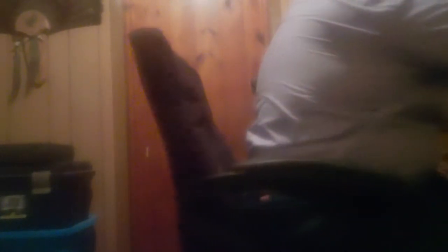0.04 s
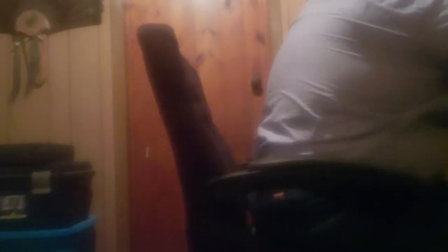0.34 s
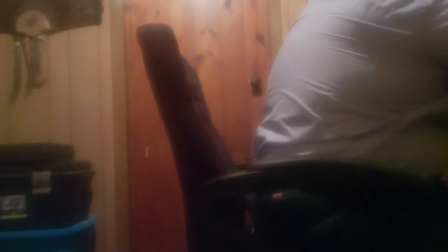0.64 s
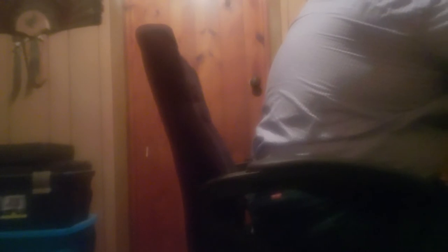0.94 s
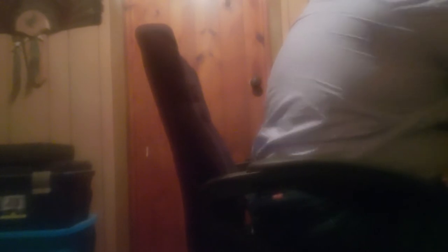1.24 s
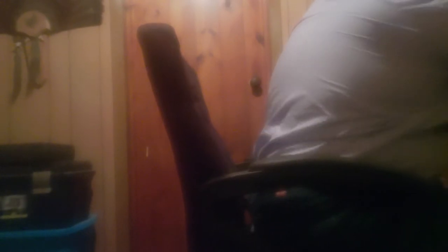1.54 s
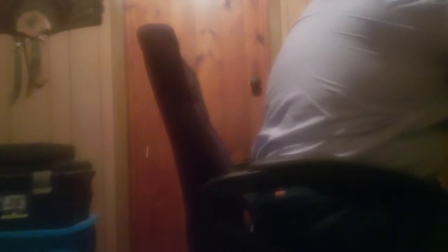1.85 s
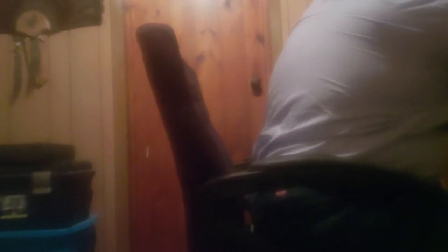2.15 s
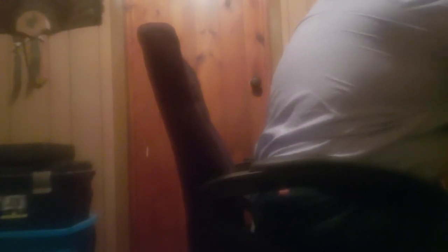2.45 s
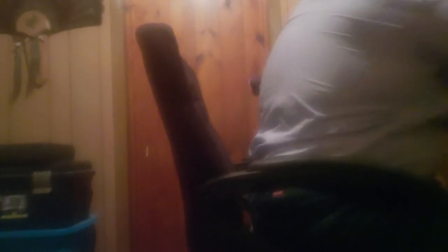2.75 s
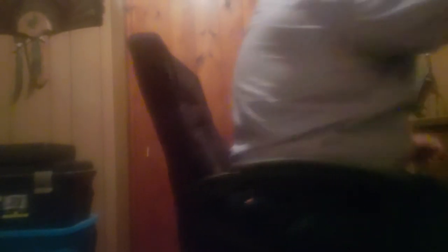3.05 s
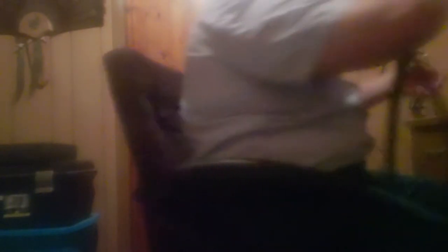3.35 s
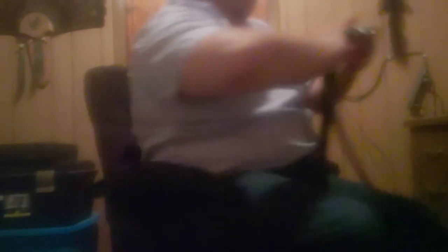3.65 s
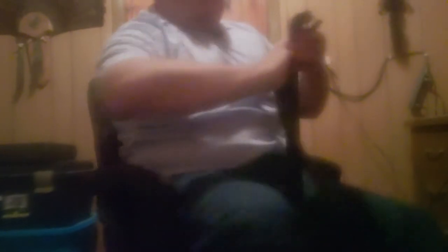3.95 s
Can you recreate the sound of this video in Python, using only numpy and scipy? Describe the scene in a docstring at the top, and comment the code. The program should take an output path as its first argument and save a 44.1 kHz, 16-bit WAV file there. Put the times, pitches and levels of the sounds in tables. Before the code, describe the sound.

An office chair knocks and creaks as someone shifts in it, loudest in the first 0.6 seconds, with two small metallic ticks. Lighter knocks and soft clothing rustle follow around 1.3 and 2.5 seconds. From about 3.3 seconds the chair swivels with a high, slightly wavering squeak, a brief rumble and more knocks, lasting until 4 seconds. A faint low hum fills the small room throughout.

```python
"""An office chair in a small wood-panelled room, a stereo microphone across the room from it.
Over a low mains hum, someone shifts in the seat: the frame knocks and creaks as its contacts
chatter, a steel part pings, and clothes brush the upholstery. After about three seconds the chair
swivels: the dry bearing sticks and slips in a high squeak, its left-right balance shifting with
the room's reflections, while the chair rumbles round and the frame knocks on."""
import sys
import numpy as np
from scipy import signal
from scipy.fft import rfft, irfft
from scipy.io import wavfile

SR = 44100
rng = np.random.default_rng(int(sys.argv[2]) if len(sys.argv) > 2 else 0)


def generate_wav(sig):
    """Save sig (samples, or channels by samples) to the path in sys.argv[1] as 16-bit PCM at SR."""
    pcm = np.round(np.clip(np.atleast_2d(sig).T, -1, 1) * 32767).astype(np.int16)
    wavfile.write(sys.argv[1], SR, pcm)


N = 176400
TIME = np.arange(N) / SR
CHAIR_WET = 0.9  # the room's share of the power of knocks and rubbing at the microphone


def from_db(db):
    """Decibels to gain."""
    return 10 ** (np.asarray(db) / 20)


def unit_rms(x):
    """Scale to unit rms."""
    return x / np.sqrt(np.mean(x ** 2) + 1e-20)


def in_time(rows):
    """A control curve at every sample."""
    return np.interp(TIME, *np.transpose(rows))


def at_hz(points, hz):
    """Read a table on a log-frequency axis."""
    f, value = np.transpose(points)
    return np.interp(np.log(np.maximum(hz, 1)), np.log(f), value)


def pan(db):
    """Left and right gains for a level difference."""
    gains = from_db(np.array([[.5], [-.5]]) * db)
    return gains / np.sqrt(np.mean(gains ** 2, axis=0))


def drift(rate_hz):
    """Slow random motion with spread 1."""
    r = np.exp(-2 * np.pi * rate_hz / SR)
    return unit_rms(signal.lfilter([1], [1, -2 * r, r * r], rng.standard_normal(N + SR))[SR:])


def colour(x, *curves, size=8192):
    """Causal filter whose gain is the sum of some (frequency [Hz], gain [dB]) curves."""
    hz = np.fft.rfftfreq(size, 1 / SR)
    cepstrum = irfft(np.log(from_db(sum(at_hz(c, hz) for c in curves))))
    fold = np.r_[1, np.full(size // 2 - 1, 2), np.zeros(size // 2)]  # makes it minimum phase
    impulse = irfft(np.exp(rfft(cepstrum * fold)))[:size // 2]
    return signal.fftconvolve(x, impulse)[:len(x)]


def grains(per_s, size, spread_db):
    """Random tiny slips of uneven strength; unit rms."""
    strength = from_db(spread_db * np.minimum(rng.exponential(1, size), 4)) * rng.choice([-1, 1], size)
    return unit_rms(strength * (rng.random(size) < per_s / SR))


def ring(x, hz, t60):
    """One mode: a unit click rings as a dying tone of height 1."""
    r, w = from_db(-60 / (t60 * SR)), 2 * np.pi * hz / SR
    return signal.lfilter([1, -r * np.cos(w)], [1, -2 * r * np.cos(w), r * r], x + 1e-18)


def diffuse(size):
    """Noise from all around the microphone: both sides alike in the bass, unrelated in the treble."""
    # likeness of left and right: (frequency [Hz], correlation [0..1])
    likeness = [(60, 1), (130, 0.95), (290, 1), (640, 0.38), (1400, 0), (3000, 0.16), (15000, 0)]
    # the room's lean to one side: (frequency [Hz], left minus right [dB])
    balance = [(100, 1.2), (300, 0.5), (700, 3), (1400, -1.5), (4000, 1.5), (15000, -0.5)]
    hz = np.fft.rfftfreq(size, 1 / SR)
    alike = at_hz(likeness, hz)
    mid, side = np.exp(2j * np.pi * rng.random((2, len(hz))))
    spectra = np.sqrt(1 + alike) * mid + np.sqrt(1 - alike) * side * [[1], [-1]]
    return unit_rms(irfft(spectra * pan(at_hz(balance, hz)), size))


def room_tail(size=22050, bands=9):
    """The room's dense echoes, dying octave by octave; unit energy."""
    # reverberation of the panelled room: (frequency [Hz], t60 [s])
    decay_times = [(80, 0.3), (220, 0.36), (560, 0.19), (1500, 0.2), (4000, 0.25), (12000, 0.2)]
    t, hz = np.arange(size) / SR, np.fft.rfftfreq(size, 1 / SR)
    noise = rfft(diffuse(size))
    centres = np.geomspace(60, 15000, bands)
    tail = 0
    for centre, share in zip(centres, np.eye(bands)):
        weight = at_hz(np.c_[centres, share], hz)
        band = irfft(noise * weight, size) * from_db(-60 * t / at_hz(decay_times, centre))
        tail = tail + unit_rms(band) * np.sqrt(np.mean(weight ** 2))
    early_db, early_s = 2.5, .018  # near walls strengthen the first echoes
    return unit_rms(tail * from_db(early_db * np.exp(-t / early_s))) / np.sqrt(size)


def in_room(x, tail, wet):
    """Direct sound plus the room; wet is the room's share of the power."""
    x = np.atleast_2d(x)
    echoes = signal.fftconvolve(x, tail, axes=1)[:, :x.shape[1]]
    return np.sqrt(1 - wet) * x + np.sqrt(wet) * echoes


def mains_hum():
    """Low mains hum in the centre, each tone wavering slightly in level."""
    # tones of the hum: (frequency [Hz], level [dB])
    tones = [(59.2, -46.5), (119, -59.5), (213, -64.5)]
    hum = 0
    for hz, db in tones:
        level = np.sqrt(2) * from_db(db + 0.64 * drift(rate_hz=4.4))
        hum = hum + level * np.sin(2 * np.pi * (hz * TIME + rng.random()))
    return hum


def room_tone():
    """A dull, steady rumble from all around."""
    # spectrum of the rumble: (frequency [Hz], gain [dB])
    spectrum = [(20, -13), (40, -0.5), (85, 5), (120, 7), (160, -12), (230, 0), (320, -7), (480, -4.5),
                (650, -24.5), (850, -21), (1200, -36.5), (2500, -39.5), (6000, -43.5), (9000, -51),
                (13000, -40), (16000, -43.5)]
    air = np.array([colour(side, spectrum)[SR:] for side in diffuse(N + SR)])
    return from_db(-51) * unit_rms(air)


def clothes():
    """Cloth slides over upholstery in soft swells of fine grains."""
    # brushes against the seat: (peak time [s], rise [s], fall [s], level [dB])
    brushes = [(0.014, .01, 0.044, -57), (0.40, .11, .10, -62.5), (0.734, 0.017, 0.023, -60),
               (1.23, 0.02, 0.1, -63.5), (1.44, 0.086, 0.08, -61), (1.95, 0.14, 0.16, -73.5),
               (2.345, 0.052, .05, -62.5), (2.472, 0.023, 0.11, -55.5), (2.648, 0.072, 0.034, -59),
               (2.81, 0.069, 0.028, -66.5), (2.951, 0.041, 0.088, -56.5), (3.12, 0.26, 0.31, -63)]
    # spectrum of rubbing cloth: (frequency [Hz], gain [dB])
    spectrum = [(60, -9.5), (200, 12), (500, 12.5), (900, 10), (1500, -3.5), (2700, 2), (4000, -3.5),
                (5600, -1.5), (8000, -10), (12000, -9.5), (16000, -11.5)]
    swell = 0
    for peak_s, rise_s, fall_s, db in brushes:
        width_s = np.where(TIME < peak_s, rise_s, fall_s)
        swell = swell + from_db(db) * np.exp(-((TIME - peak_s) / width_s) ** 2 / 2)
    return swell * unit_rms(colour(grains(per_s=3600, size=N, spread_db=2), spectrum))


def rolling():
    """The turning chair grinds and rumbles under load."""
    # loudness of the turn: (time [s], level [dB])
    levels = [(3.2, -96), (3.3, -65), (3.43, -55), (3.52, -33.5), (3.58, -38.5), (3.66, -46.5), (3.75, -47),
              (3.84, -43), (3.92, -49.5), (4.0, -49)]
    # spectrum of the grinding: (frequency [Hz], gain [dB])
    spectrum = [(30, 18), (80, 21), (200, 11), (500, 8), (1000, 7.5), (1600, 2.5), (3000, 5.5), (5500, 0),
                (8500, -4), (12500, -11), (16000, -27.5)]
    grinding = colour(grains(per_s=1600, size=N, spread_db=4), spectrum)
    return from_db(in_time(levels)) * unit_rms(grinding)


def metal_pings():
    """A small steel part of the mechanism ticks with a short, high ring."""
    # ticks of the part: (time [s], level [dB])
    ticks = [(0.040, -27), (0.503, -37), (1.198, -56), (2.446, -60)]
    # its modes: (frequency [Hz], gain [dB])
    modes = [(4850, -4), (5150, -1.5), (5550, -8)]
    clicks = np.zeros(N)
    for s, db in ticks:
        clicks[int(s * SR)] = from_db(db)
    return sum(from_db(db) * ring(clicks, hz, t60=0.013) * (-1) ** k for k, (hz, db) in enumerate(modes))


def frame_knocks(size=22050):
    """A first contact and a chatter of slips ring the frame; each knock takes its own echo paths."""
    # knocks: (time [s], level [dB], rise [s], chatter [s], thump [dB], clack [dB], snap [dB], fizz [dB])
    knocks = [(0.040, 18, 0.0045, 0.027, -3.5, -0.5, -2.5, 4.5),
              (0.1241, 26, 0.00022, 0.0027, -12, -1.5, -4.5, -4.5),
              (0.141, 8, .0005, 0.007, 10, -9, -16, 11.5),
              (0.320, 8.5, 0.004, 0.083, -14.5, -12.5, -11.5, -9.5),
              (0.508, 9.5, 0.0027, 0.034, 1, -11.5, 0, 3.5), (0.562, 14, 0.0017, 0.031, -3, -4, -13.5, -16),
              (1.199, -21, .01, .035, 14, -9, 16.5, 13), (1.304, -8.5, 0.006, 0.033, 8, 13, 20, 13),
              (1.328, 5.5, 0.0096, 0.022, 7.5, -11, 2, 9.5),
              (1.488, 5.5, 0.0045, 0.029, 5, -3.5, -15.5, -21),
              (2.106, -7.5, 0.0084, 0.027, 19, -5.5, 1, 3), (2.148, -10, .0004, .006, 6, 5, 11.5, 14),
              (2.506, 6, 0.0098, 0.019, 8.5, 2.5, -1, -4), (2.538, 9.5, 0.00055, 0.0081, -1, 3, -5, -5.5),
              (3, -13.5, 0.00034, 0.0056, 17, 16, 21.5, 19), (3.223, -6, 0.0023, 0.024, -20, -2.5, 4.5, 2),
              (3.251, 9.5, .003, 0.02, 2.5, 9.5, 8.5, -4.5),
              (3.464, 15.5, 0.0086, 0.046, -18.5, 5.5, 8.5, 6), (3.63, -8.5, 0.0085, .02, 6, 19.5, 21, 11),
              (3.687, 1.5, 0.0067, 0.026, -15, 11, 13.5, 19.5), (3.784, 6, .01, 0.014, -12, 6, 13, 5),
              (3.806, 20, 0.0035, 0.02, -28.5, 0.5, 6, 4.5)]
    # where thump, a 0 dB anchor, clack, snap and fizz lie: (frequency [Hz])
    colour_hz = [120, 650, 2200, 5000, 11000]
    # the tone all knocks share, from the frame and the room's resonances: (frequency [Hz], gain [dB])
    shared_colour = [(35, -32), (60, -2.5), (85, 8), (140, -4.5), (230, 6.5), (380, -4), (550, -1),
                     (720, -7), (1000, -5), (1500, -11), (2300, -14), (3300, -15.5), (5000, -20),
                     (6500, -20.5), (8500, -31), (12500, -25.5), (16000, -35)]
    # the frame's modes: (frequency [Hz], gain [dB], t60 [s])
    modes = [(84.5, -64, .16), (217.5, -58, 0.36), (366.8, -52, 0.16), (468.4, -50.5, 0.2),
             (552, -44, 0.042), (881, -36.5, 0.013), (1154, -54, 0.013), (1912, -50, .04), (2890, -40, .03)]
    first_hit, hard_rise_s = 2.2, 0.0023  # first contact against the chatter; slower rises lose it
    out, t = np.zeros((2, N + size)), np.arange(size) / SR
    for s, db, rise_s, chatter_s, thump, clack, snap, fizz in knocks:
        envelope = (1 - np.exp(-t / rise_s)) ** 2 * np.exp(-(t / chatter_s) ** 2)
        blow = unit_rms(grains(per_s=1800, size=size, spread_db=1) * envelope) / np.sqrt(size)
        blow[0] += first_hit * np.exp(-rise_s / hard_rise_s)
        own_colour = np.c_[colour_hz, [thump, 0, clack, snap, fizz]]
        force = from_db(db) * colour(blow / np.linalg.norm(blow), shared_colour, own_colour)
        ringing = sum(from_db(mode_db) * ring(force, hz, t60) for hz, mode_db, t60 in modes)
        start = int(s * SR)
        out[:, start:start + size] += in_room(force + ringing, room_tail(), CHAIR_WET)
    return out[:, :N]


def bearing_squeak(tail):
    """Stick-slip in the dry bearing: a whistle that roughens and gains overtones as it catches."""
    # the whistle's glide: (time [s], pitch [Hz])
    pitches = [(3.25, 3600), (3.295, 3514), (3.33, 3569), (3.40, 3600), (3.445, 3660), (3.47, 3666),
               (3.52, 3653), (3.56, 3671), (3.635, 3655), (3.665, 3558), (3.70, 3630), (3.73, 3615),
               (3.76, 3546), (3.79, 3370), (3.825, 3325), (3.87, 3360), (3.905, 3430), (3.94, 3517),
               (3.975, 3626), (4.0, 3645)]
    # its fundamental: (time [s], level [dB])
    levels = [(3.245, -61), (3.27, -34.5), (3.32, -30), (3.39, -27.5), (3.44, -35.5), (3.49, -18.5),
              (3.525, -26.5), (3.555, -18), (3.62, -25), (3.645, -34), (3.72, -32), (3.87, -32.5),
              (3.905, -21.5), (3.93, -35), (3.98, -25), (4.0, -34)]
    # its balance, shifting with room reflections as the chair turns: (time [s], left minus right [dB])
    balance = [(3.27, 5.5), (3.37, 3), (3.416, 5), (3.492, -14.0), (3.514, -10), (3.586, 4.5),
               (3.824, -6.5), (3.912, 5), (3.93, 1), (4.0, 2.0)]
    # harmonics 2, 3 and 4 at full grip: (level [dB])
    overtone_levels = [-36.5, -38.5, -39.5]
    # their balance: (left minus right [dB])
    overtone_pans = [-5, 0, 5.5]
    jitter_depth, wander_depth, left_lead_rad = 0.00442, 0.0015, 0.94
    grip_start_s, grip_build_s, grip_range_db = 3.287, 0.029, 28
    roughness = np.where(TIME < 3.3, .35, 1)  # steadier until the bearing catches
    jitter = roughness * jitter_depth * drift(rate_hz=249)
    pitch = in_time(pitches) * (1 + jitter + wander_depth * drift(rate_hz=30))
    phase = 2 * np.pi * np.cumsum(pitch) / SR
    sounding = np.sqrt(2) * (TIME > levels[0][0])
    flutter_db = roughness * 1.8 * drift(rate_hz=49)
    whistle = sounding * from_db(in_time(levels) + flutter_db) * np.sin([phase + left_lead_rad, phase])
    out = pan(in_time(balance)) * in_room(whistle, tail, wet=.2)
    grip_db = -grip_range_db * np.exp(-np.maximum(TIME - grip_start_s, 0) / grip_build_s)
    for multiple, (db, pan_db) in enumerate(zip(overtone_levels, overtone_pans), 2):
        flutter_db = 2.8 * drift(rate_hz=33)
        overtone = sounding * from_db(db + grip_db + flutter_db) * np.sin(multiple * phase)
        out = out + pan(pan_db) * in_room(overtone, tail, wet=.7)
    return out


def scene():
    """The chair and its sitter, heard from across the small room."""
    tail = room_tail()
    rubbing = in_room(clothes() + rolling(), tail, CHAIR_WET)
    pings = in_room(metal_pings(), tail, wet=.5)
    return bearing_squeak(tail) + rubbing + pings + frame_knocks() + mains_hum() + room_tone()


def record(dry):
    """The microphone signal is cut steeply above 16.2 kHz."""
    return signal.sosfilt(signal.ellip(10, .1, 80, 16200, fs=SR, output="sos"), dry)


dry = scene()
out = record(dry)
generate_wav(out)
```